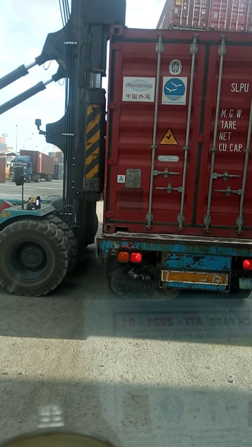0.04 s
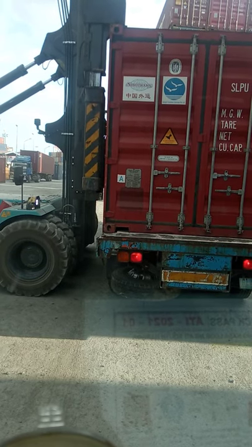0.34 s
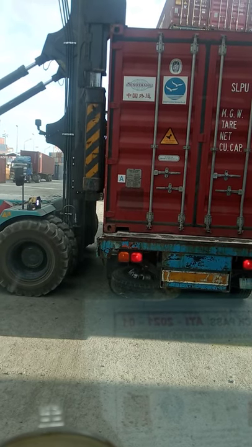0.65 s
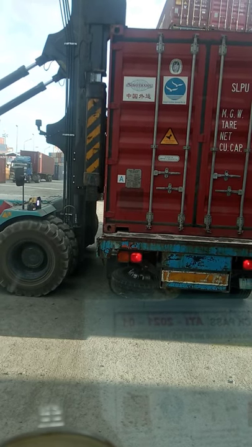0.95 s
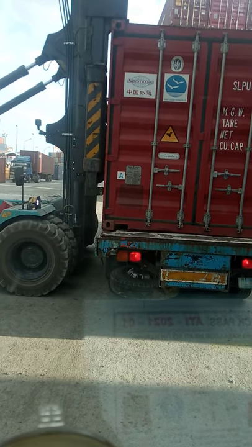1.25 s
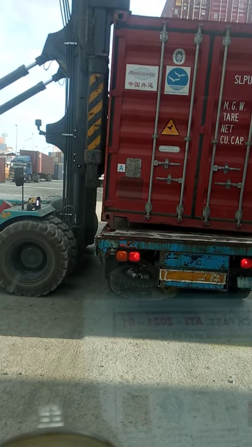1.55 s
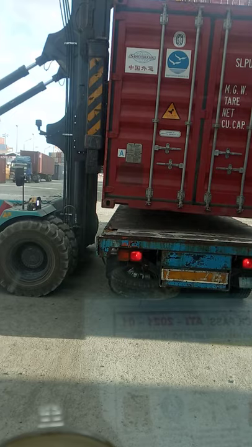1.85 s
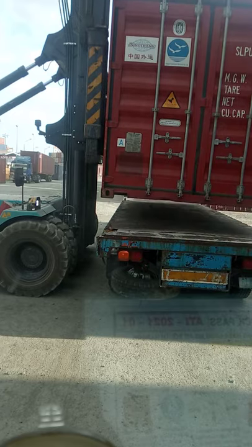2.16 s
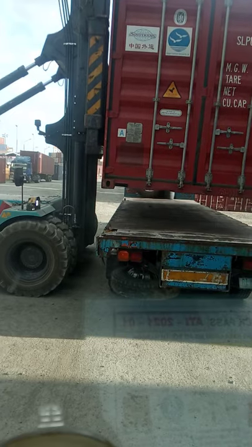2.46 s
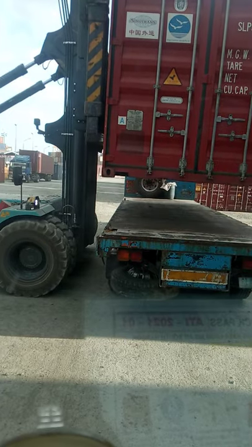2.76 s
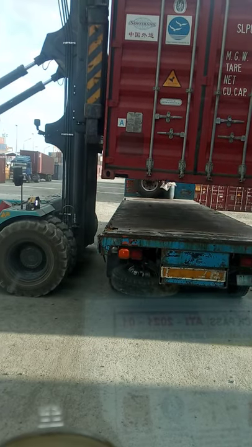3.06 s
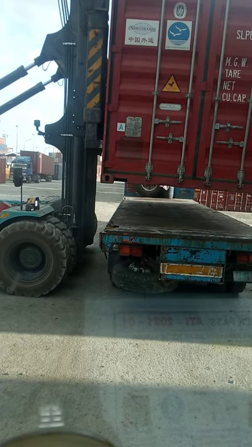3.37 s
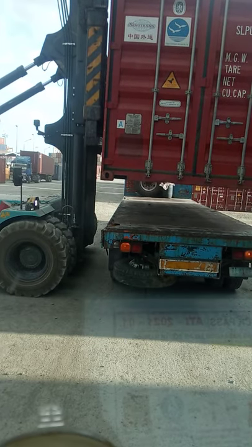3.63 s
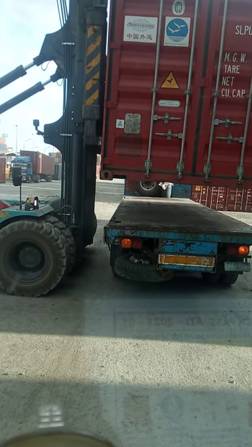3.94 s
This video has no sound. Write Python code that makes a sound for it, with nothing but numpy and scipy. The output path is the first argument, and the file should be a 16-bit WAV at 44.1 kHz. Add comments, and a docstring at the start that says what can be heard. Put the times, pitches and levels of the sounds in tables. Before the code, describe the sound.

A steel shipping container lifts off a trailer with a sharp metal bang, then clanks and booms hollowly as it swings free. The lifting machine's diesel engine rumbles steadily throughout, heard from a vehicle cab in a yard.

```python
"""Container lift in a yard

One microphone in a vehicle cab, the container handler's diesel running steadily at working speed.
Air leaks faintly and the hydraulics squeal as they take a steel container off a trailer. The box shifts,
slams against its fittings and clanks a few more times as it swings free; its hollow walls boom on."""
import sys
import numpy as np
from scipy import signal
from scipy.fft import rfft, irfft
from scipy.io import wavfile
from scipy.ndimage import uniform_filter1d

SR = 44100
rng = np.random.default_rng(int(sys.argv[2]) if len(sys.argv) > 2 else 0)


def inscribe(sig):
    """Save sig as 16-bit PCM at rate SR to the path in sys.argv[1].

    A 1-D sig is mono; a 2-D sig holds one channel per row.
    Samples are clipped to [-1, 1] before scaling.
    """
    pcm = np.round(np.clip(np.atleast_2d(sig).T, -1, 1) * 32767)
    wavfile.write(sys.argv[1], SR, pcm.astype(np.int16))


N = 176400
TIME = np.arange(N) / SR


def amp(db):
    """Decibels to gain."""
    return 10 ** (np.asarray(db) / 20)


def unit(x):
    """Scales to rms 1."""
    return x / np.sqrt(np.mean(x ** 2) + 1e-20)


def read(points, hz):
    """Reads a table along a log-frequency axis."""
    f, value = np.transpose(points)
    return np.interp(np.log(hz + 1), np.log(f + 1), value)


def add(mix, start_s, sound):
    """Mixes a sound in at a time."""
    part = mix[round(start_s * SR):][:len(sound)]
    part += sound[:len(part)]


def noise(colour):
    """Noise of rms 1 with a given spectrum."""
    hz = np.fft.rfftfreq(N, 1 / SR)
    magnitude = amp(read(colour, hz)) * (hz < colour[-1][0])
    return unit(irfft(magnitude * np.exp(2j * np.pi * rng.random(len(hz))), N))


def wander(rate_hz):
    """Random drift of rms 1, mostly slower than the given rate."""
    hz = np.fft.rfftfreq(N, 1 / SR)
    return unit(irfft(rfft(rng.standard_normal(N)) * (hz > 0) / (1 + (hz / rate_hz) ** 4), N))


# Engine tones at the cab: multiple of the crank speed, rms level/dB
CRANK_ORDERS = [(3, -45.5), (4, -51.5), (5, -45), (9, -50.5), (10, -47), (11, -48.5), (12, -50),
                (13, -53.5), (14, -54), (15, -51.5), (23, -60.5), (24, -63.5), (25, -59)]
# Spectrum of the rumble: f/Hz, relative level/dB
RUMBLE_COLOUR = [(20, -16.5), (46, -6.5), (60, -10.5), (80, 1.5), (145, 2), (195, -4.5), (265, -0.5),
                 (350, -11.5), (430, -11), (500, -15.5), (590, -18), (680, -14), (790, -22), (1050, -21),
                 (1500, -39), (2500, -73), (6000, -100)]
# The rumble swells slightly around the lift: t/s, level/dB
RUMBLE_SWELL = [(0, -32.5), (.9, -30.5), (2, -32), (3, -32.5), (4, -33.5)]
# Spectrum of the diesel clatter: f/Hz, relative level/dB
CLATTER_COLOUR = [(600, -10.5), (1020, -5.5), (1300, 4), (1550, 0), (1730, -4), (2300, -7.5), (2900, -13.5),
                  (3800, -19), (4150, -16), (4700, -23.5), (5300, -25), (6000, -26), (6650, -23.5),
                  (6950, -32), (7500, -31), (7950, -38), (8350, -31.5), (8700, -36), (9400, -32.5),
                  (11000, -43), (12200, -50.5), (15500, -62.5)]
CRANK_HZ, PUMP_HZ = 27.57, 540


def engine():
    """The diesel: crank orders and a pump whine, in rumble and clatter that pulse once a turn."""
    turns = np.cumsum(CRANK_HZ * (1 + 0.003 * wander(rate_hz=1.67))) / SR
    hum = np.zeros(N)
    for order, db in CRANK_ORDERS:
        hum += amp(db + 0.74 * wander(rate_hz=2.1)) * np.sin(2 * np.pi * (order * turns + rng.random()))
    pump = amp(-57 + 1.8 * wander(rate_hz=0.7)) * np.sin(2 * np.pi * turns * PUMP_HZ / CRANK_HZ)
    rumble = noise(RUMBLE_COLOUR) * amp(np.interp(TIME, *np.transpose(RUMBLE_SWELL)))
    pulsing = 1 + 0.044 * np.cos(2 * np.pi * turns)
    flutter = amp(0.5 * wander(rate_hz=23))
    clatter = amp(-53.5) * unit(flicker(noise(CLATTER_COLOUR)))
    return np.sqrt(2) * (hum + pump) + pulsing * flutter * (rumble + clatter)


# Unevenness of the treble: f/Hz, level swing/dB
FLICKER_DEPTH = [(1000, -0.5), (3000, 3.5), (6000, 5), (10000, 4), (12000, 2.5)]


def flicker(x):
    """The treble flickers in small patches of pitch and time."""
    hz, _, bands = signal.stft(x, SR, nperseg=1024)
    patches = uniform_filter1d(rng.standard_normal(bands.shape), size=2, axis=0)
    patches = unit(uniform_filter1d(patches, size=4, axis=1))
    return signal.istft(bands * amp(read(FLICKER_DEPTH, hz)[:, None] * patches), SR, nperseg=1024)[1][:N]


# Faint, very high leak of air: t/s, length/s, level/dB
AIR_LEAK = (.32, .3, -88)
# Its spectrum: f/Hz, relative level/dB
AIR_COLOUR = [(9000, -26), (11000, -8), (12600, 0), (14000, -14), (15500, -25)]
# Thin squeal of the hydraulics taking the load: t/s, length/s, level/dB
OIL_SQUEAL = (.935, 0.07, -64.5)
# Its spectrum: f/Hz, relative level/dB
OIL_COLOUR = [(2800, -49), (3380, -17), (3470, 3), (3560, -22), (4500, -48)]


def valve(event, colour):
    """Air or oil escapes through a valve in one short swell."""
    start_s, length_s, db = event
    progress = np.clip((TIME - start_s) / length_s, 0, 1)
    return amp(db) * np.sqrt(np.sin(np.pi * progress) + 1e-12) * noise(colour)


def onset(rise_s):
    """Build-up of vibration as a blow spreads through the steel."""
    return 1 - np.exp(-(TIME / rise_s) ** 2)


def dense_ring(colour, t60):
    """Countless overlapping plate modes, each band dying at its own speed."""
    hz, t, bands = signal.stft(noise(colour)[:N // 2], SR, nperseg=512)
    tail = signal.istft(bands * amp(-60 * t / read(t60, hz)[:, None]), SR, nperseg=512)[1]
    return np.pad(tail, (0, N - len(tail)))


def ring(modes):
    """The modes that stand out, each a dying sine beating with a weaker twin."""
    t = TIME[:N // 2]
    tone = np.zeros(N)
    for hz, db, t60 in modes:
        for twin_db in (0, -7):
            pitch = hz * (1 + 0.0041 * rng.standard_normal())  # like parts ring slightly apart
            add(tone, 0, amp(db + twin_db - 60 * t / t60) * np.sin(2 * np.pi * (pitch * t + rng.random())))
    return tone


# Steel-on-steel blows out in the yard: t/s, clang level/dB, clash level/dB, clang cutoff f/Hz
BLOWS = [(1.009, -1.5, -19, 387), (1.032, -3, -12, 358), (1.065, -3, -1.5, 2010), (1.071, -3.5, -3, 2390),
         (1.103, -11.5, -11.5, 520), (1.130, -11.5, -16.5, 930), (1.160, -9.5, -16, 910),
         (1.200, -7.5, -24.5, 450), (1.254, -8.5, -15, 404), (1.283, -16, -21.5, 496),
         (1.315, -9.5, -12.5, 380), (1.362, -17.5, -28.5, 1480), (1.404, -10.5, -26.5, 450),
         (1.515, -13, -33, 590), (1.64, -12, -31.5, 330), (2.545, -12, -35, 400), (2.603, -21.5, -24, 900)]


def blows():
    """Each blow rings the walls, the frame and the loose corner fittings, which chatter."""
    out = np.zeros(N)
    for start_s, clang_db, clash_db, cutoff_hz in BLOWS:
        clang = wall_clang(clang_db, cutoff_hz)
        chatter = amp(1.5 * wander(rate_hz=160))
        add(out, start_s, clang + chatter * fitting_clash(clash_db))
    return out


# Spectrum of the corrugated walls: f/Hz, relative level/dB
WALL_COLOUR = [(100, -8), (220, -9), (330, 3.5), (390, -6), (520, -5), (760, -6.5), (1100, -22.5),
               (1700, -23.5), (2500, -38.5), (5000, -51), (9000, -90)]
# Their ring time: f/Hz, t60/s
WALL_T60 = [(150, 0.54), (350, 0.64), (700, 0.39), (2000, 0.34), (6000, .3)]
# Ringing of the steel frame: f/Hz, relative level/dB, t60/s
FRAME_MODES = [(333.4, 0.5, 1), (317.6, -1, 0.1), (426, -12.5, 0.94), (454, -5.5, 0.5), (541, -10, 1),
               (658, -12, 0.81), (713, -10, 0.52), (800, -12, 0.5), (892, -5.5, 0.33), (1295, -19.5, 1),
               (1460, -19.5, 0.53), (1818, -12, 0.16)]


def wall_clang(db, cutoff_hz):
    """Walls and frame ring together; a soft contact dulls them above the cutoff."""
    steel = amp(-20.5) * dense_ring(WALL_COLOUR, WALL_T60) + amp(-26) * ring(FRAME_MODES)
    contact = signal.butter(2, cutoff_hz, fs=SR, output="sos")
    return amp(db) * signal.sosfilt(contact, steel * onset(rise_s=0.0052))


# Spectrum of the clashing fittings: f/Hz, relative level/dB
CLASH_COLOUR = [(900, -4.5), (1800, 6.5), (2700, -1.5), (4400, -0.5), (5500, -6.5), (6500, -5), (7700, -14),
                (9600, -15), (12000, -19.5), (15500, -35.5)]
# Their ring time: f/Hz, t60/s
CLASH_T60 = [(1000, 1), (4000, 0.45), (9500, 0.62), (13000, .23)]
# Their clearest tones: f/Hz, relative level/dB, t60/s
FITTING_MODES = [(1842, 0.5, .6), (2030, -10, 0.49), (2095, -9, 0.47), (2454, -6.5, 0.35),
                 (2960, -11.5, 0.54), (3280, -6, 0.26), (4400, -19.5, 0.32), (4880, -13, 0.15),
                 (5980, -11, 0.32), (6530, -16.5, 0.37)]
SHIMMER_ABOVE_HZ = 7300


def fitting_clash(db):
    """The bright crash of the hard corner fittings: a quick bite, then a shimmer on top."""
    steel = amp(-43) * flicker(dense_ring(CLASH_COLOUR, CLASH_T60)) + amp(-45) * ring(FITTING_MODES)
    top_hz = np.clip(15600 + 333 * db, SR / 20, SR * 9 / 20)  # a weaker clash reaches less high
    steel = signal.sosfilt(signal.butter(6, top_hz, fs=SR, output="sos"), steel)
    bite = signal.sosfiltfilt(signal.butter(4, SHIMMER_ABOVE_HZ, fs=SR, output="sos"), steel)
    shimmer = steel - bite
    return amp(db) * (bite * onset(rise_s=0.003) + shimmer * onset(rise_s=0.01))


# Heaves of the hollow box: t/s, relative level/dB, focus f/Hz
HEAVES = [(1.028, -6.5, 165), (1.099, 1.5, 130), (1.169, 4, 124), (1.280, 0, 155), (1.340, -5, 149),
          (1.47, -4, 141), (1.545, -6, 85.5), (1.708, -7, 97), (1.969, -9, 96), (2.142, -13.5, 97)]
# Spectrum of the flexing panels: f/Hz, relative level/dB
PANEL_COLOUR = [(35, 0), (50, -18.5), (62, -21.5), (76, 8.5), (100, -1.5), (140, -3), (190, -0.5),
                (270, -5.5), (380, -13.5), (700, -65.5)]
# Low modes of the box: f/Hz, relative level/dB, t60/s
BOX_MODES = [(82.6, -1.5, 0.43), (96.2, -2, 1.3), (104.3, -1.5, 0.53), (137, -3, 0.54), (155.1, -1.5, 0.66),
             (232.9, -3.5, 0.66), (269.4, -0.5, 2.1)]
PANEL_T60_S, FOCUS_DB_PER_OCTAVE = 0.59, 16.5


def booms():
    """The big panels flex and the empty box booms like a drum; each heave favours modes near one pitch."""
    out = np.zeros(N)
    for start_s, db, focus_hz in HEAVES:
        panels = amp(-22 - 60 * TIME / PANEL_T60_S) * noise(PANEL_COLOUR)
        modes = [(hz, level - FOCUS_DB_PER_OCTAVE * abs(np.log2(hz / focus_hz)), t60)
                 for hz, level, t60 in BOX_MODES]
        add(out, start_s, amp(db) * onset(rise_s=0.0038) * (panels + amp(-18) * ring(modes)))
    return out


def scene():
    """The yard from the cab, in mono: the container lift over the running engine."""
    return (engine() + valve(AIR_LEAK, AIR_COLOUR) + valve(OIL_SQUEAL, OIL_COLOUR) + blows() + booms())[None]


LOW_CUT_HZ, BAND_LIMIT_HZ = 71, 15700


def record(dry):
    """The microphone's bass roll-off and steady hiss, and the recorder's band limit."""
    thinned = signal.sosfilt(signal.butter(2, LOW_CUT_HZ, "highpass", fs=SR, output="sos"), dry)
    mic_hiss = amp(-87) * rng.standard_normal(N)
    band_limit = signal.firwin(511, BAND_LIMIT_HZ, window=("kaiser", 9), fs=SR)
    return signal.oaconvolve(thinned + mic_hiss, band_limit[None], "same")


dry = scene()
out = record(dry)
inscribe(out)
```